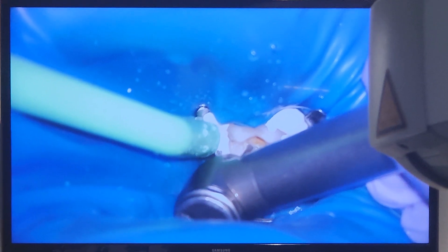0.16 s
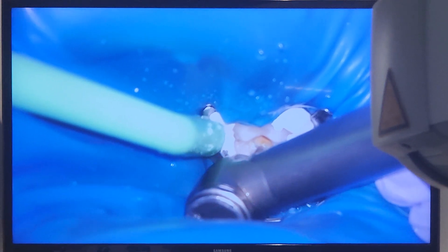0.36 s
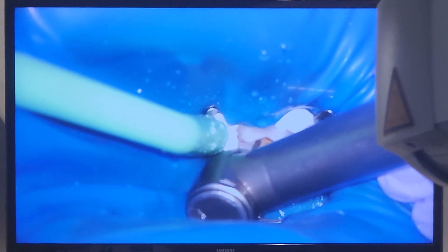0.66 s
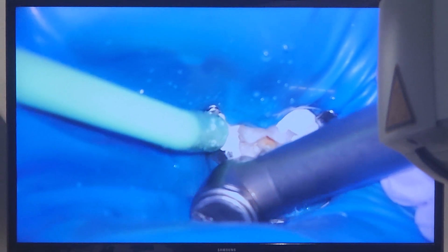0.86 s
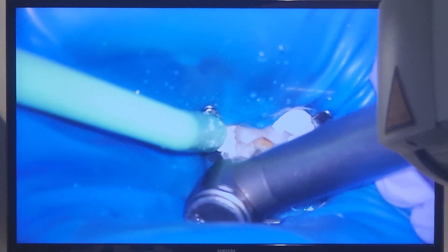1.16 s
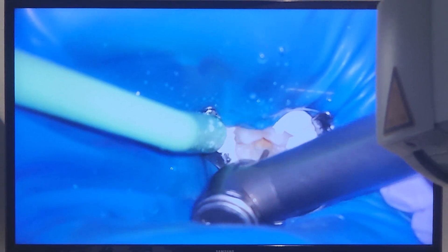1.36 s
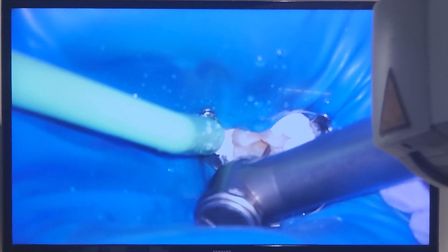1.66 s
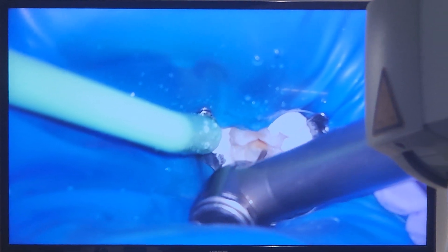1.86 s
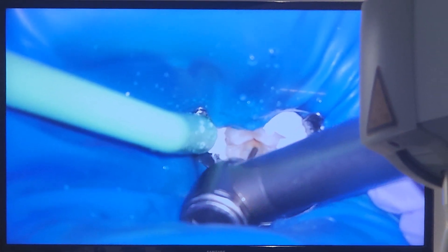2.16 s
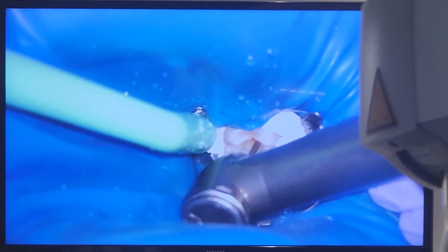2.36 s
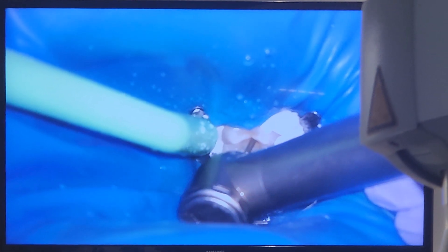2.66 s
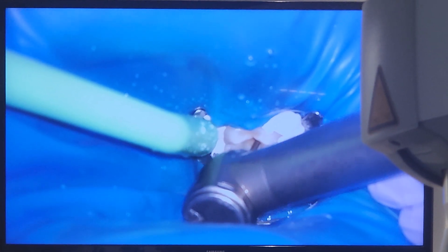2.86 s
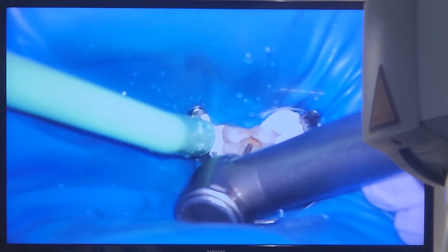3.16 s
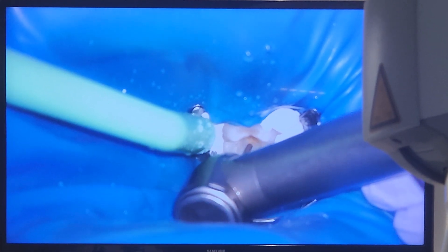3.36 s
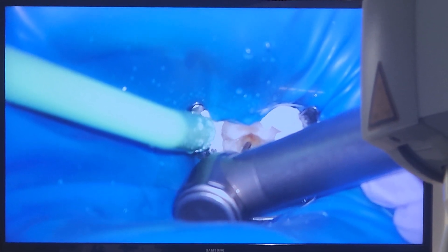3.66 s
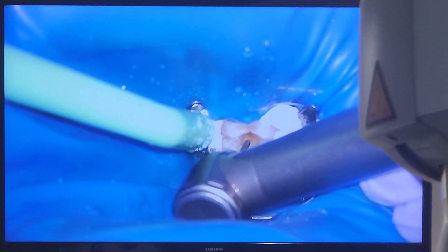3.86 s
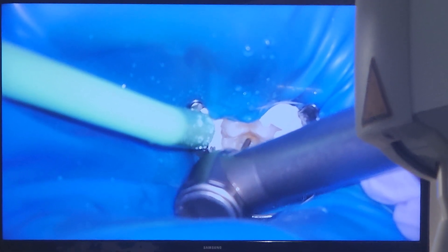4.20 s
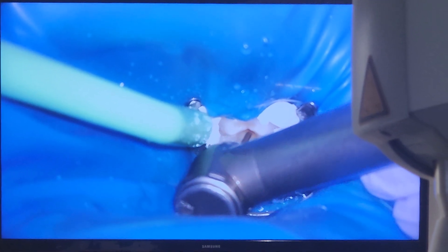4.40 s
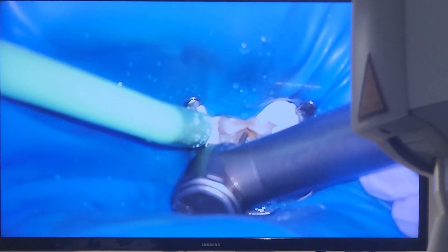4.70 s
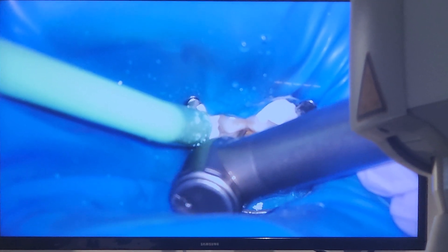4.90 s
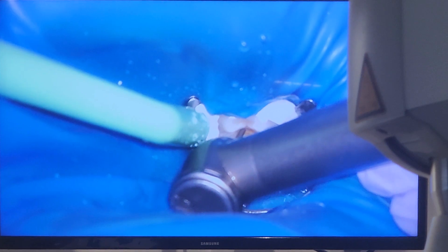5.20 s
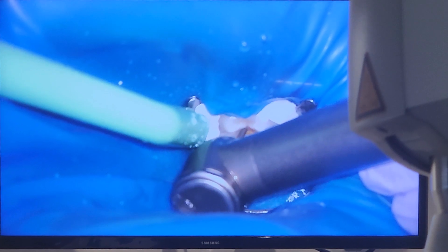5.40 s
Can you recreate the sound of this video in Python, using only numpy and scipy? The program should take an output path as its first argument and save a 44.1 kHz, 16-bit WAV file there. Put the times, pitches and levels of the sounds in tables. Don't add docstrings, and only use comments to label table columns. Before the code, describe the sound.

Close phone-like stereo pickup at arm's length from a dental chair: broad suction hiss with thin whistling, coolant spray and faint low rumble. A piercing turbine tone wavers under load for three seconds, then valve air bursts out and the pitch falls away. After a short drill-free gap with gurgles and handling thuds, it spins up and resumes cutting, its sliding pitch smeared by the room.

```python
import sys
import numpy as np
from scipy import signal
from scipy.fft import rfft, irfft
from scipy.io import wavfile
from scipy.ndimage import uniform_filter1d

SR = 44100
rng = np.random.default_rng(int(sys.argv[2]) if len(sys.argv) > 2 else 0)


def to_wav(sig):
    pcm = np.clip(np.atleast_2d(sig), -1, 1) * 32767
    pcm = np.round(pcm).astype(np.int16)
    wavfile.write(sys.argv[1], SR, pcm.T)


def boost(x):
    u = np.asarray(x, float) / 20
    return 10 ** u


N = 244314
HZ = np.arange(N // 2 + 1) * SR / N
TIME = np.arange(N) / SR
PEDAL_UP_S, PEDAL_DOWN_S = 3.01, 3.897


def over_hz(table):
    hz, value = np.transpose(table)
    return np.interp(np.log(HZ + 1), np.log(hz + 1), value)


def peaks(modes):
    power = 0
    for hz, width, db in modes:
        power = power + boost(2 * db) / (1 + (2 * (HZ - hz) / width) ** 2) ** 2
    return np.sqrt(power)


def walk(rate):
    k = int(SR / rate)
    held = np.repeat(rng.standard_normal(N // k + 1), k)
    return 1.3 * uniform_filter1d(uniform_filter1d(held, k), k)[:N]


def swells(rows, x=TIME):
    return sum(size * np.exp(-((x - at) / half) ** 2) for at, size, half in rows)


def ramp(start_s, length_s):
    return np.clip((TIME - start_s) / length_s, 0, 1)


# frequency in Hz, shared power from 0 to 1.
ALIKE = [(20, .6), (150, .72), (300, .88), (700, .68), (1300, .3), (3500, .5), (7000, .55), (10500, .45),
         (13500, .7), (16000, .5)]
# frequency in Hz, phase in radians.
LEFT_LEAD = [(0, 0), (860, -0.1), (2150, 4.6), (2930, 5.0), (4050, 3.8), (5770, 9.7), (7240, 10.8),
             (8530, 16.1), (9910, 16.5), (10400, 17.2), (12000, 14.8), (13700, 15.1), (14800, 14.7),
             (16600, 15.7)]
# frequency in Hz, level in dB.
LEFT_COLOUR = [(1250, -15), (2400, -7), (3000, -3), (4500, -9), (6700, -14), (7500, -9), (8300, -12),
               (9200, -7), (11600, -5), (12000, -6), (12700, -1), (13500, -3), (14200, 0), (15700, -5)]
# frequency in Hz, level in dB.
RIGHT_COLOUR = [(1250, -15), (2400, -7), (3000, -3), (4600, -6), (6000, -2), (7400, -7), (8300, -11),
                (10000, -10), (10900, -15), (12000, -7), (13200, -8), (14200, -12), (15300, -17),
                (15700, -19)]


def air(gain):
    shared, left, right = rfft(rng.standard_normal((3, N))) * gain
    alike = np.clip(over_hz(ALIKE), 0, 1)
    lead = np.exp(1j * np.interp(HZ, *np.transpose(LEFT_LEAD)))
    left = np.sqrt(alike) * shared * lead + np.sqrt(1 - alike) * left
    right = np.sqrt(alike) * shared + np.sqrt(1 - alike) * right
    pair = np.array([left * boost(over_hz(LEFT_COLOUR)), right * boost(over_hz(RIGHT_COLOUR))])
    pair = irfft(pair, N)
    return pair / np.sqrt(np.mean(pair ** 2))


def room(x, t60_s):
    t = TIME[:SR // 2]
    decay = np.exp(-np.log(1000) * t / t60_s) * (t > .004)
    tail = rng.standard_normal((2, len(t))) * decay
    tail = tail / np.sqrt(np.sum(tail ** 2, axis=1, keepdims=True))
    return signal.fftconvolve(x, tail, axes=1)[:, :N]


def compressor_hum():
    tone_hz, level_db = 839.5, -57
    return np.sqrt(2) * boost(level_db + 0.71 * walk(3.24)) * np.sin(2 * np.pi * tone_hz * TIME)


# frequency in Hz, density in dB per Hz.
RUMBLE_COLOUR = [(15, 8.5), (30, 0), (45, -2), (68, 6.5), (80, 6.5), (95, -3), (125, -4.5), (165, -21.5)]


def rumble():
    rumble_db, sway_db, tiring_from_s = -42.5, -48.5, 3.1
    side_db = np.array([[-0.6], [2.5]])
    low = air(boost(over_hz(RUMBLE_COLOUR)) * (HZ < 170)) * boost(rumble_db + 0.42 * walk(4.13) + side_db)
    sway = air((HZ > 15) * (HZ < 38)) * boost(sway_db) * (0.73 + ramp(tiring_from_s, .8))
    return low + sway


# frequency in Hz, density in dB per Hz.
HOSE_COLOUR = [(130, -5), (190, -4), (300, 1), (600, 3), (1250, 0), (3000, -2.5), (8000, -2.5),
               (16000, -1.5)]
# centre in seconds, extra level in dB, half length in seconds.
HARDER_DRAWS = [
    (.3, 1, 0.84),
    (2.9, 2.5, 0.13),
    (3.6, 3, 0.17),
    (5.45, 1.5, 0.22),
]


def hose_hiss():
    hiss_db = -27.5
    steady = rfft(air(boost(over_hz(HOSE_COLOUR))))
    hiss = 0
    for low_hz in 125 * 2. ** np.arange(7):
        octave = irfft(steady * (HZ >= low_hz) * (HZ < 2 * low_hz), N)
        hiss = hiss + octave * boost(.55 * walk(6))
    return hiss * boost(hiss_db + swells(HARDER_DRAWS) + 0.13 * walk(3.11))


# frequency in Hz, width in Hz, level in dB.
HOSE_PIPES = [(2940, 35, -2), (2790, 1030, -14.5), (2820, 29, -23), (3153, 62, -11), (2160, 27, -5),
              (3870, 46, -3), (4510, 18, -3.5), (689, 32, -5.5)]
# centre in seconds, extra level in dB, half length in seconds.
WHISTLE_RISES = [
    (.2, 5.5, 0.61),
    (2.7, 1.5, 0.18),
    (3.62, 4.5, 0.14),
    (4.1, 1.5, 0.072),
]


def hose_whistle():
    return air(peaks(HOSE_PIPES)) * boost(-37.5 + swells(WHISTLE_RISES) + 0.67 * walk(12))


# frequency in Hz, width in Hz, level in dB.
WATER_MODES = [(265.4, 26, -1), (328.5, 35, -1)]
# centre in seconds, extra level in dB, half length in seconds.
WATER_GULPS = [
    (.4, -1, 0.16),
    (2.1, 1, 1),
    (2.9, 11, 0.077),
    (3.62, 14, 0.16),
    (4.1, 11, 0.23),
]


def hose_gurgle():
    return air(peaks(WATER_MODES)) * boost(-59 + swells(WATER_GULPS) + 5.6 * walk(7.97))


# frequency in Hz, width in Hz, level in dB.
NOZZLE_MODES = [(5420, 380, 0), (5650, 200, -3)]
# centre in seconds, extra level in dB, half length in seconds.
COOLANT_SPURTS = [
    (0, 7.5, 0.67),
    (2.35, 13, 0.4),
    (3.15, 10.5, 0.32),
    (5.5, 3, .5),
]


def coolant_spray():
    return air(peaks(NOZZLE_MODES)) * boost(-45.5 + swells(COOLANT_SPURTS))


# frequency in Hz, density in dB per Hz.
JET_COLOUR = [(1500, -17.5), (3000, -12.5), (4300, -0.5), (5400, 0), (6500, 0), (7600, -1.5), (9500, -7.5),
              (12000, -4), (15900, -1)]


def exhaust_jet():
    full_db, idle_db = -27, -7.5
    fade_s, rise_from_s, rise_s = 0.54, 3.88, 0.46
    idle = ramp(PEDAL_UP_S, fade_s) ** 1.7 - ramp(rise_from_s, rise_s)
    return air(boost(over_hz(JET_COLOUR))) * boost(full_db + idle_db * idle + 0.56 * walk(9.5))


# frequency in Hz, density in dB per Hz.
VENT_COLOUR = [(400, -1.5), (1300, -1.5), (3000, -4.5), (5500, 0.5), (8500, 0.5), (11000, -2.5),
               (13000, 3.5), (15900, -1.5)]
# frequency in Hz, width in Hz, level in dB.
VALVE_MODES = [(6200, 180, 9), (12550, 500, -3), (10600, 250, -2), (15300, 800, 5)]
# centre in seconds, extra level in dB, half length in seconds.
SNAP = [
    (3.05, 4, 0.0033),
]


def valve_vent():
    level_db, attack_s, hold_s, fall_db_per_s = -19.5, .012, .13, 48
    falling_s = np.maximum(TIME - PEDAL_UP_S - hold_s, 0)
    vent_db = level_db + swells(SNAP) - fall_db_per_s * falling_s
    opening = ramp(PEDAL_UP_S - .006, attack_s)
    puff = air(boost(over_hz(VENT_COLOUR)) * (1 + peaks(VALVE_MODES)))
    puff = puff * opening * boost(vent_db + 1.1 * walk(60))
    chirp_s, chirp_db, chirp_half_s, chirp_hz, chirp_width_hz = 3.08, -32, .035, 6200, 160
    chirp = air(peaks([(chirp_hz, chirp_width_hz, 0)])) * swells([(chirp_s, boost(chirp_db), chirp_half_s)])
    return puff + chirp


# time in seconds, peak in dB, frequency in Hz.
HAND_KNOCKS = [
    (0.237, -25, 55.3),
    (3.742, -29, 58),
    (3.778, -31, 310),
    (3.783, -20, 64.4),
    (3.785, -30, 129),
    (3.956, -34, 63),
    (4.045, -27.5, 250),
    (4.065, -33, 330),
]


def hand_bumps():
    out = 0
    for at_s, peak_db, hz in HAND_KNOCKS:
        turns = (TIME - at_s) * hz
        envelope = np.exp(-((turns - .35) / 0.45) ** 2)
        out = out + boost(peak_db) * np.sin(2 * np.pi * (turns - .3)) * envelope
    return out * boost(np.array([[-9.0], [4.0]]))


# centre in seconds, sag in Hz, half length in seconds.
TOOTH_BITES = [(.151, 137, .149), (.337, 139, .126), (.445, 58, .03), (.608, 157, .09), (.798, 192, .097),
               (.918, 150, .065), (1.236, 240, .125), (1.3, 8, 1.3), (1.824, 316, .142), (2.3, 14, .1),
               (2.654, 116, .107), (4.645, 155, .078), (5.022, 150, .09), (5.284, 102, .085),
               (5.507, 50, .075)]
FREE_HZ = 7160


def rotor_hz():
    brake_hz_per_s, bleed_s, spin_up_s = 7600, .118, .368
    coast = np.maximum(TIME - PEDAL_UP_S, 0)
    push = np.maximum(TIME - PEDAL_DOWN_S, 0)
    down = FREE_HZ - brake_hz_per_s * (coast - bleed_s * (1 - np.exp(-coast / bleed_s)))
    up = FREE_HZ * (1 - np.exp(-(push / spin_up_s) ** 2))
    return np.maximum(down, up) - swells(TOOTH_BITES)


# speed in Hz, left level in dB, right level in dB.
ROTOR_SONG = [(2100, -51, -45), (2800, -46, -43), (3500, -40, -38), (4400, -36, -31.5), (5400, -30, -22),
              (6200, -29.5, -21.5), (6800, -32.5, -28), (7200, -31.5, -27)]
# frequency in Hz, half width in Hz, left dB, right dB.
STANDING_WAVES = [(6872, 18, 0, 3), (6915, 15, 4, 1), (6972, 10, -3, -3), (7000, 13, 4, 9.5),
                  (7085, 30, 5, 0), (7140, 40, 0, 10), (7143, 5, 0, -5), (7160, 6, 7, 0)]


def turbine():
    rest_from_s, rest_to_s = 3.82, 4.12
    turning = uniform_filter1d(1. * ((TIME < rest_from_s) | (TIME > rest_to_s)), 2000)
    speed = rotor_hz()
    sag_hz = swells(TOOTH_BITES)
    phase = 2 * np.pi * np.cumsum(speed + 1.8 * walk(60)) / SR

    at_hz, *sing_db = np.transpose(ROTOR_SONG)
    level_db = []
    for side, trim_db in enumerate((-0.1, -0.25)):
        waves = [(row[0], row[2 + side], row[1]) for row in STANDING_WAVES]
        level_db.append(np.interp(speed, at_hz, sing_db[side]) + trim_db + swells(waves, speed))
    whine = boost(np.array(level_db)) * np.sin(phase + np.array([[1.5], [0]]))

    drag_db = 25 * sag_hz / 1000
    coast_db = -90 * (1 - (speed + sag_hz) / FREE_HZ)
    octave_db = -41 + drag_db + coast_db + 3.5 * walk(7)
    octave = boost(octave_db + np.array([[-2.5], [-14.0]])) * np.sin(2 * phase)
    direct = np.sqrt(2) * turning * (whine * boost(1.0 * walk(30)) + octave)

    sliding = np.clip(abs(np.gradient(speed)) * SR / 1700, .2, 1)
    return direct + boost(1.5) * room(direct * sliding, .45)


def scene():
    hose_and_rumble = hose_hiss() + hose_whistle() + hose_gurgle() + rumble()
    drive_air = exhaust_jet() + coolant_spray() + valve_vent()
    hiss = hose_and_rumble + drive_air
    treble = signal.sosfilt(signal.butter(2, 1200, "high", fs=SR, output="sos"), hiss)
    reflected = boost(-9.0) * room(treble, .1)
    return compressor_hum() + hiss + reflected + hand_bumps() + turbine()


def top_cut(x):
    return signal.sosfilt(signal.butter(12, 17020, fs=SR, output="sos"), x)


def record(dry):
    cut = signal.sosfilt(signal.ellip(12, .2, 80, 15720, fs=SR, output="sos"), dry)
    return top_cut(cut)


dry = scene()
out = record(dry)
to_wav(out)
```